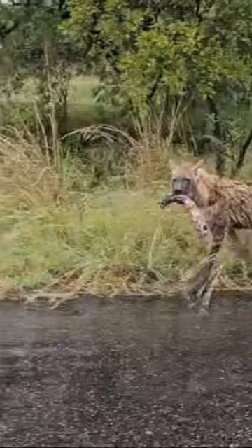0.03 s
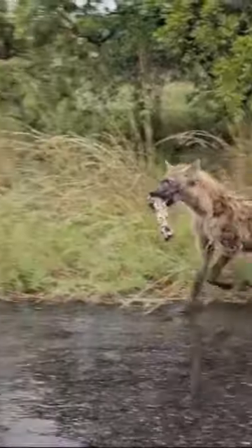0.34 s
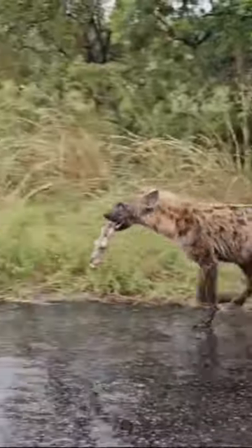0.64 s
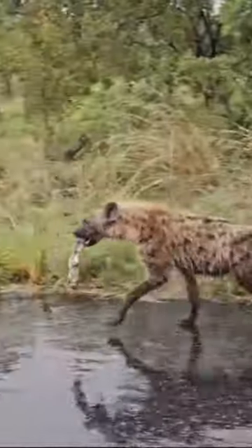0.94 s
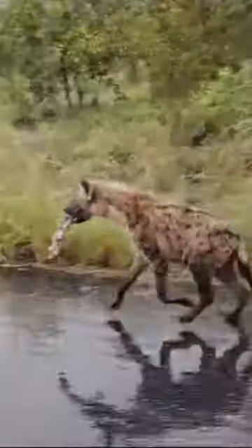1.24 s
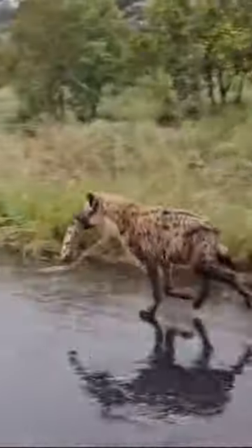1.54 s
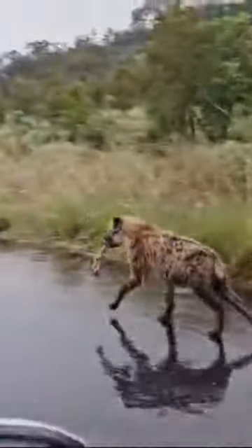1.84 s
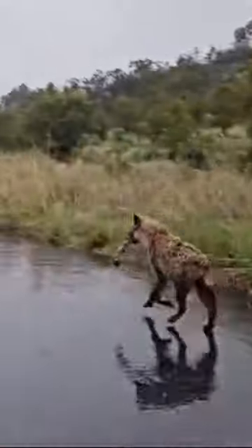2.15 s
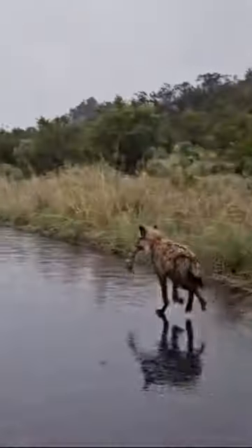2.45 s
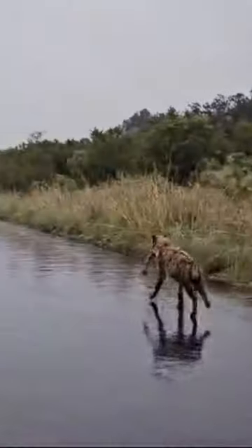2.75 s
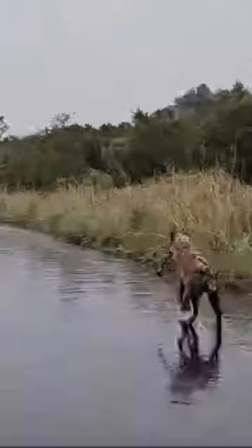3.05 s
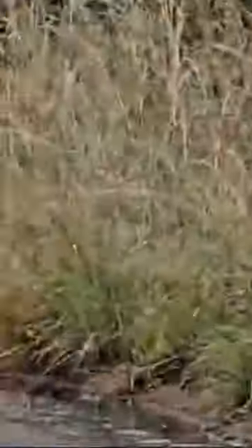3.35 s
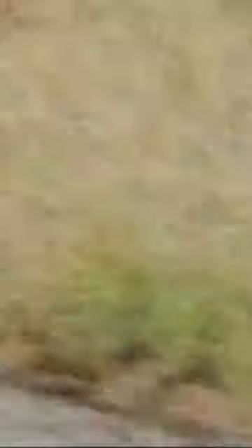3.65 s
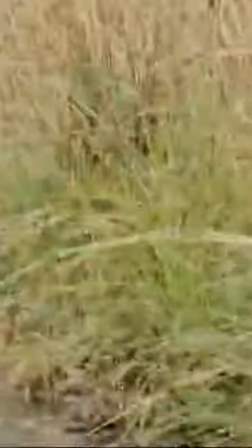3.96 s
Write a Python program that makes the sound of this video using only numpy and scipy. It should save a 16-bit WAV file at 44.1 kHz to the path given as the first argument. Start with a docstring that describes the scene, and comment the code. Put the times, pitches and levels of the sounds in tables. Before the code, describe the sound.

A slow car rumbles on a wet road, heard from inside by an open window, its engine throbbing while wind buffets the microphone on and off. Faint clicks and crackle come in the first second. Tyre hiss builds until about 2.8 seconds, with a faint sinking hum. Around a sharper click near 3 seconds, the tyres recede and a hollow brake hiss takes over as the rumble grows.

```python
"""Slow car on a wet road

From inside, by an open window: the engine throbs, the body rumbles and tyres hiss on the water.
Wind buffets the two ports of a microphone that swings round. Light clicks come early on;
around a sharper one the tyres recede and a hollow hiss, like rubbing brakes, takes over."""
import sys
import numpy as np
from scipy import signal
from scipy.fft import rfft, irfft
from scipy.io import wavfile
from scipy.ndimage import map_coordinates

SR = 44100
rng = np.random.default_rng(int(sys.argv[2]) if len(sys.argv) > 2 else 0)


def waveform_to_disk(signal):
    """Save audio, clipped to [-1, 1], as 16-bit WAV at the path in sys.argv[1]."""
    frames = np.transpose(np.atleast_2d(signal))
    scaled = np.clip(frames, -1, 1) * 32767
    samples = np.round(scaled).astype(np.int16)
    wavfile.write(sys.argv[1], SR, samples)


N = 176400
TIME = np.arange(N) / SR
HZ = np.fft.rfftfreq(N, 1 / SR)

# how much later the car and road reach the left port as the microphone turns (time [s], lag [ms])
LEFT_LAG = [(.1, 0.43), (1, 0.51), (1.5, 0.38), (1.95, 0.24), (2.3, 0.14), (2.8, 0.11), (3.6, 0.043)]
# how alike the road sounds left and right (frequency [Hz], likeness [0-1])
ROAD_LIKENESS = [(100, .85), (500, .76), (1400, .87), (2200, .7), (4400, .62), (7500, .52), (11000, .25)]
# stereo balance of the tyres (frequency [Hz], left minus right [dB])
TYRE_PAN = [(100, 0.5), (600, -0.5), (3200, -3), (5000, -1), (7700, -5.5), (10000, -0.5)]
# colour of the body rumble (frequency [Hz], gain [dB])
RUMBLE_EQ = [(12, 4), (30, -1), (65, 6), (110, -4.5), (170, -17.5), (280, -13), (400, -25.5), (600, -27),
             (1500, -49)]
# fader ride of the body rumble (time [s], level [dB])
RUMBLE_FADER = [(.1, -41.5), (.8, -40.5), (1.6, -45.5), (2.8, -42), (3.02, -41.5), (3.4, -37.5), (4, -31.5)]
# engine harmonics (order [multiple of the firing rate], relative level [dB])
ENGINE_HARMONICS = [(1, -4.5), (2, -1.5), (3, -0.5), (4, -13.5), (6, -26), (7, -26), (8, -23.5), (9, -24),
                    (10, -23), (11, -21.5)]
# swell of the harmonic that booms in the cabin (time [s], boost [dB])
CABIN_BOOM = [(.1, -3.5), (1.5, -2.5), (1.95, -7), (2.6, 2.5), (3.1, -1), (3.6, 5), (4, 4)]
# wind buffets (centre [s], nominal length [s], level [dB], left minus right [dB], high cut [Hz])
EDDIES = [(0.464, 0.096, -44, -9, 203), (0.523, 0.14, -28.5, -7.5, 62.4), (0.627, 0.053, -33.5, -10, 83),
          (0.978, 0.12, -33, 1.5, 175), (1.08, 0.19, -36, 2, 69.5), (1.663, 0.22, -36.5, -1, 138),
          (1.736, 0.048, -28, -3, 70), (2.078, 0.067, -37, -14, 203), (2.142, 0.047, -30, -6.5, 79),
          (2.34, 0.073, -30.5, -10, 91), (2.763, 0.041, -30.5, 2, 88), (2.818, 0.25, -43.5, -14.5, 200),
          (3.744, 0.068, -32.5, -1, 308), (3.787, 0.071, -31.5, 1, 217), (3.929, 0.13, -33, -3, 82),
          (3.987, 0.059, -34.5, -17, 69.6)]
# fader ride of the fine crackle (time [s], level [dB])
CRACKLE_FADER = [(.18, -66), (.22, -62), (.45, -63), (.58, -69), (1, -78), (4, -71)]
# base colour of clicks, crackle and swish (frequency [Hz], gain [dB])
CLICK_EQ = [(300, -16), (2000, -8), (4000, -0.5), (7000, -3), (10300, -11), (12000, -3), (15500, -14)]
# light clicks, then one sharp one (time [s], level [dB], decay [s], tilt [dB/octave])
CLICK_CUES = [(.13, -52, .006, 3), (.2, -54, .007, 3), (.338, -49, .011, 2), (.466, -49, .006, 1.5),
              (.765, -47, .003, 2.5), (.832, -50, .004, 3), (1.574, -54, .0015, 5),
              (3.0677, -36, .0008, -2.5)]
# resonances of the rubbing brakes (frequency [Hz], width [Hz], relative level [dB])
BRAKE_RESONANCES = [(454.3, 184, 9.5), (875, 160, -3.5), (1395, 140, -3), (2490, 200, -6), (3400, 690, -1),
                    (3930, 280, 0.5), (4490, 260, -0.5)]
# fader ride of the rubbing, with a short first grab (time [s], hiss [dB], whine [dB])
BRAKE_FADERS = [(3.02, -72, -76), (3.065, -50.5, -73), (3.17, -55.5, -61), (3.27, -55, -58.5),
                (3.68, -49.5, -58), (3.74, -49, -58.5), (3.82, -50, -64.5), (3.9, -52, -55),
                (4, -51.5, -59.5)]
# sinking hum of the tread (time [s], pitch [Hz], level [dB])
TREAD_GLIDE = [(1.9, 320, -68), (2.4, 307.2, -57), (2.9, 285, -54), (3.5, 265, -56.5), (4, 251, -72)]
# colour of the tread roar (frequency [Hz], gain [dB])
ROAR_EQ = [(150, 12.5), (500, 4), (650, 2.5), (810, 3), (1010, -0.5), (1350, 4.5), (1700, -3), (2200, -3.5),
           (2500, -15.5), (5000, -49)]
# colour of the water spray (frequency [Hz], gain [dB])
SPRAY_EQ = [(1200, 1), (2550, 0), (2900, 2.5), (4500, 4), (5300, -4), (15500, -34)]
# colour of the finer mist (frequency [Hz], gain [dB])
MIST_EQ = [(2500, -18), (4500, -6), (5400, 1), (7900, 2), (10300, -11), (11700, -3.5), (13000, -10),
           (15500, -12)]
# fader ride of the tyres on the wet road (time [s], roar [dB], spray [dB], mist [dB])
TYRE_FADERS = [(.1, -54, -62.5, -69), (.55, -53, -62, -65.5), (1.3, -49.5, -57, -60),
               (1.65, -48.5, -56.5, -61.5), (2.25, -47.5, -55, -57.5), (2.65, -48, -52.5, -58),
               (2.83, -47.5, -51, -56.5), (2.98, -53.5, -57, -60), (3.2, -58, -59.5, -63),
               (3.65, -55, -61.5, -62.5), (4, -57, -66, -63)]


def amp(db):
    """Decibels to gain."""
    return 10 ** (np.asarray(db) / 20)


def unit(x):
    """Scales to rms 1."""
    return x / np.sqrt(np.mean(x ** 2) + 1e-20)


def curve(rows, column=1):
    """One column of a time table at every sample."""
    rows = np.array(rows)
    return np.interp(TIME, rows[:, 0], rows[:, column])


def across(rows, hz=HZ):
    """Reads a table along log frequency."""
    points_hz, values = np.transpose(rows)
    return np.interp(np.log(hz + 1), np.log(points_hz), values)


def band(hz, width_hz):
    """The bell curve of one resonance."""
    return 1 / (1 + 2 * ((HZ - hz) / width_hz) ** 2)


def pan(db):
    """Left and right gains; positive leans left."""
    return amp(np.array([[.5], [-.5]]) * db)


def drift(rate_hz):
    """A smooth random wobble of rms 1."""
    return unit(irfft(rfft(rng.standard_normal(N)) / (1 + (HZ / rate_hz) ** 4), N))


def noise(colour, likeness, size=N):
    """Coloured stereo noise of rms 1; likeness runs from 0 (wide) to 1 (mono)."""
    left, other = rfft(rng.standard_normal((2, size)))
    right = likeness * left + np.sqrt(1 - likeness ** 2) * other
    return unit(irfft(np.array([left, right]) * colour, size))


def add(mix, start_s, sound):
    """Drops a sound into the mix."""
    part = mix[:, max(round(start_s * SR), 0):][:, :sound.shape[1]]
    part += sound[:, :part.shape[1]]


def swing(stereo):
    """The left port's delay shrinks overall as the microphone turns towards the road."""
    late = np.arange(N) - curve(LEFT_LAG) * SR / 1000
    return np.array([map_coordinates(stereo[0], [late], order=5, mode="nearest"), stereo[1]])


def rumble(lumpy_db=2.0):
    """The rolling body lays down an uneven low bed."""
    bed = noise(amp(across(RUMBLE_EQ)), likeness=.69)
    return bed * amp(curve(RUMBLE_FADER) + lumpy_db * drift(16)) * pan(db=1)


def engine(firing_hz=23.715, level_db=-38.5, waver=.0028, unsteady_db=2.0, boom_order=3):
    """Slow firing makes a throb of wavering harmonics, one of them booming in the cabin."""
    cycles = np.cumsum(firing_hz * (1 + waver * drift(6.7))) / SR
    throb = np.zeros(N)
    for order, db in ENGINE_HARMONICS:
        gain = amp(db + unsteady_db * drift(.87) + (order == boom_order) * curve(CABIN_BOOM))
        throb += gain * np.cos(2 * np.pi * (order * cycles + rng.random()))
    return amp(level_db) * unit(throb) * pan(db=-2)


def wind(low_cut_hz=42, steepness=3.67):
    """Each eddy hits the ports with a short, bassy swell of pressure noise."""
    out = np.zeros((2, N))
    size = SR // 4
    t, hz = TIME[:size] - size / SR / 2, np.fft.rfftfreq(size, 1 / SR)
    low_cut = hz ** 3 / (hz ** 3 + low_cut_hz ** 3)
    for centre_s, length_s, db, pan_db, high_cut_hz in EDDIES:
        swell = np.cos(np.pi * np.clip(t / length_s / 1.13, -.5, .5)) ** 2
        colour = low_cut / (1 + (hz / high_cut_hz) ** steepness)
        eddy = unit(noise(colour, likeness=.92, size=size) * swell)
        add(out, centre_s + t[0], eddy * np.sqrt(np.mean(swell ** 2)) * amp(db) * pan(pan_db))
    return out


def crackle(ticks_per_s=2700, spread_db=3, grain_s=.0024, db_per_octave=2):
    """A dusting of tiny bright ticks, loudest at the start."""
    hits = rng.random(N) < ticks_per_s / SR
    ticks = hits * amp(spread_db * np.minimum(rng.exponential(1, N), 3))
    grains = unit(signal.lfilter([1], [1, -np.exp(-1 / (grain_s * SR))], ticks))
    colour = amp(across(CLICK_EQ) + db_per_octave * np.log2(HZ + 1))
    return amp(curve(CRACKLE_FADER)) * grains * noise(colour, likeness=0)


def clicks(attack_share=.3, tail_db=-22, tail_s=.01):
    """Small dry clicks with a brief cabin tail."""
    out = np.zeros((2, N))
    size = SR // 5
    t, hz = TIME[:size], np.fft.rfftfreq(size, 1 / SR)
    for start_s, db, decay_s, db_per_octave in CLICK_CUES:
        attack = np.minimum(t / (attack_share * decay_s), 1)
        release = np.exp(-t / decay_s) + amp(tail_db) * np.exp(-t / tail_s)
        colour = amp(across(CLICK_EQ, hz) + db_per_octave * np.log2(hz + 1))
        add(out, start_s, amp(db) * attack * release * noise(colour, likeness=.23, size=size))
    return out * pan(db=-1)


def swish(centre_s=3.075, half_width_s=.025, level_db=-59, db_per_octave=-4):
    """A short, soft rush of noise around the sharp click."""
    swell = np.exp(-((TIME - centre_s) / half_width_s) ** 2)
    colour = amp(across(CLICK_EQ) + db_per_octave * np.log2(HZ + 300))
    return amp(level_db) * swell * noise(colour, likeness=.36)


def tread_hum(fuzz_hz=9):
    """The tread blocks drone fuzzily, sinking in pitch as the car slows."""
    phase = 2 * np.pi * np.cumsum(curve(TREAD_GLIDE)) / SR
    drone = drift(fuzz_hz) * np.cos(phase) + drift(fuzz_hz) * np.sin(phase)
    return amp(curve(TREAD_GLIDE, column=2)) * drone


def puddle(centre_s=1.9, half_width_s=.22, level_db=-57.5):
    """A tyre runs through deeper water: a bright hiss that swells and fades."""
    swell = np.exp(-((TIME - centre_s) / half_width_s) ** 2)
    return amp(level_db) * swell * noise(band(hz=3950, width_hz=1100), likeness=.54)


def brakes(start_s=3.0, flutter_db=2.0, high_cut_hz=4800):
    """Pads rub lightly: a hollow, resonant hiss and a fuzzy whine that falters and returns."""
    high_cut = 1 / (1 + (HZ / high_cut_hz) ** 20)
    likeness = across(ROAD_LIKENESS)
    hiss = sum(amp(db + flutter_db * drift(14)) * noise(band(hz, width_hz) * high_cut, likeness)
               for hz, width_hz, db in BRAKE_RESONANCES)
    whine = noise(band(hz=2043, width_hz=89), likeness=.86)
    rubbing = unit(hiss) * amp(curve(BRAKE_FADERS)) + whine * amp(curve(BRAKE_FADERS, column=2))
    return rubbing * (TIME > start_s) * pan(db=-3)


def tyres(roar_flutter_db=1.0, water_flutter_db=.83, side_on_lag_ms=.47):
    """Tread roar, spray and mist; the water comes into focus as the microphone turns towards it."""
    balance, likeness = pan(across(TYRE_PAN)), across(ROAD_LIKENESS)
    roar = noise(amp(across(ROAR_EQ)) * balance, likeness)
    out = roar * amp(curve(TYRE_FADERS) + roar_flutter_db * drift(23))
    diffuse = np.clip(curve(LEFT_LAG) / side_on_lag_ms, 0, 1) ** 4  # fully wide when side-on
    flutter_db = water_flutter_db * drift(55)
    for eq, column in (SPRAY_EQ, 2), (MIST_EQ, 3):
        colour = amp(across(eq)) * balance
        focused = np.sqrt(1 - diffuse) * noise(colour, likeness)
        wide = np.sqrt(diffuse) * noise(colour, likeness=0)
        out += amp(curve(TYRE_FADERS, column) + flutter_db) * (focused + wide)
    return out


def scene():
    """Car and road swing in from one side; wind and small details sit right at the microphone."""
    car = engine() + rumble() + tyres() + puddle() + tread_hum() + brakes()
    return swing(car) + wind() + clicks() + crackle() + swish()


def record(dry, start_s=.115, fade_in_s=.0011, high_cut_hz=15400):
    """The mix cuts in abruptly, with the very top trimmed off."""
    gate = np.clip((TIME - start_s) / fade_in_s, 0, 1)
    low_pass = signal.firwin(511, high_cut_hz, window=("kaiser", 9), fs=SR)
    return signal.oaconvolve(dry * gate, low_pass[None], "same")


dry = scene()
out = record(dry)
waveform_to_disk(out)
```